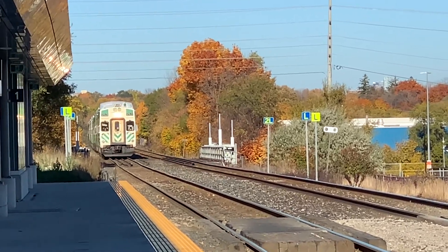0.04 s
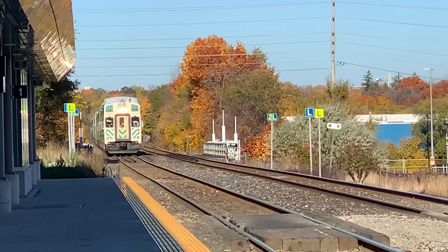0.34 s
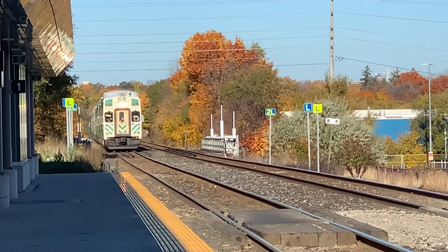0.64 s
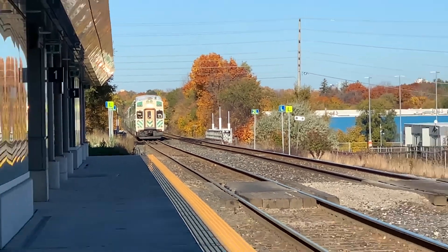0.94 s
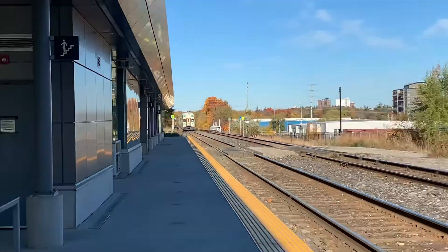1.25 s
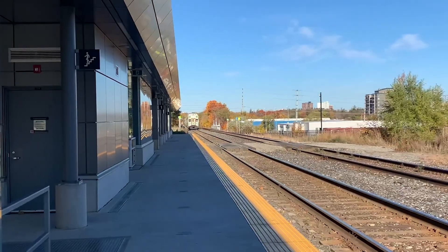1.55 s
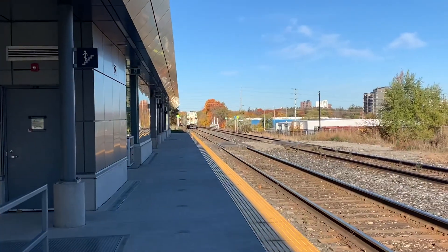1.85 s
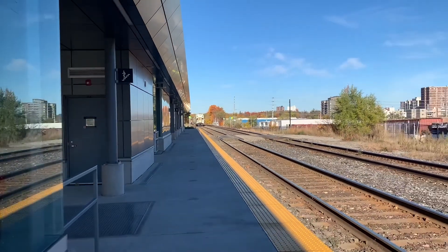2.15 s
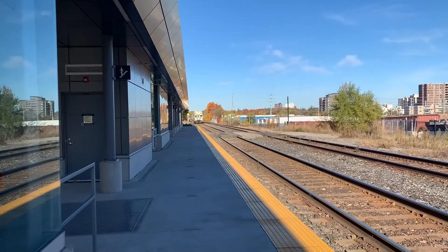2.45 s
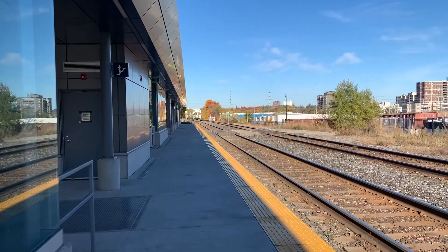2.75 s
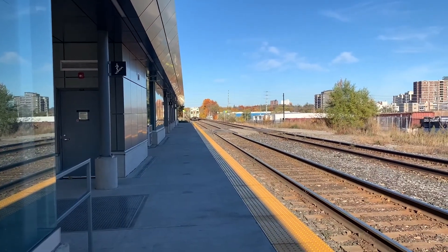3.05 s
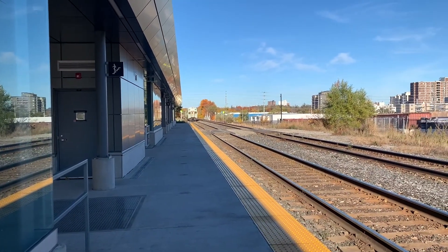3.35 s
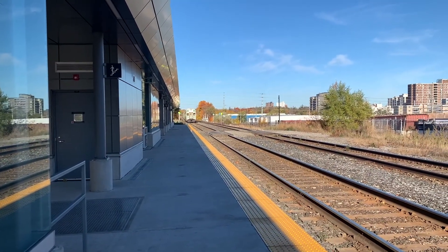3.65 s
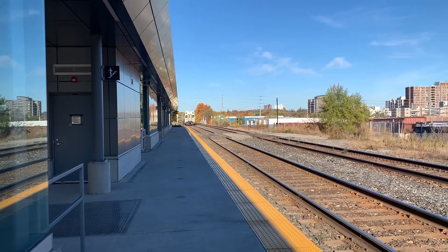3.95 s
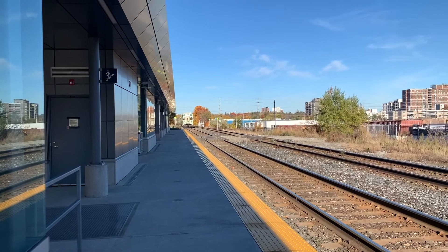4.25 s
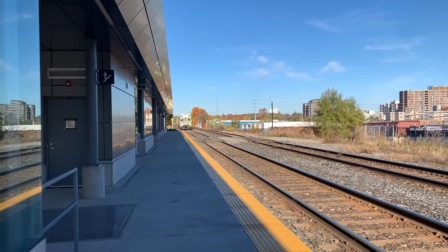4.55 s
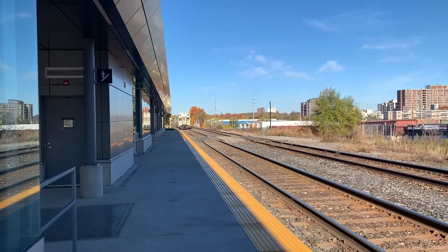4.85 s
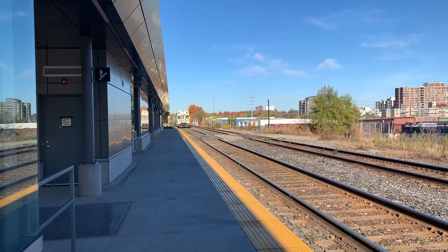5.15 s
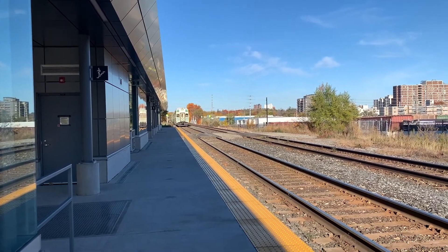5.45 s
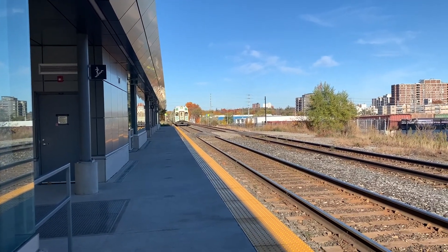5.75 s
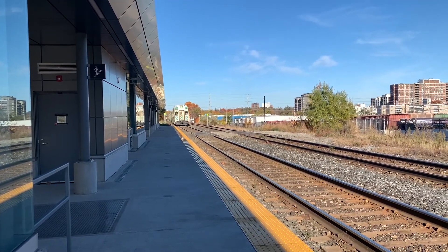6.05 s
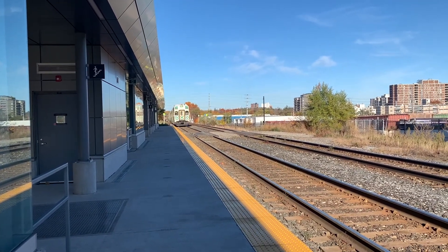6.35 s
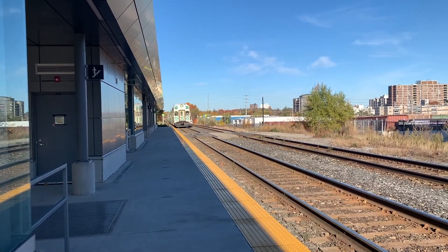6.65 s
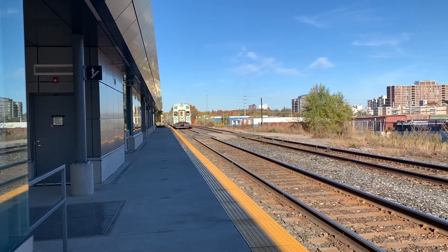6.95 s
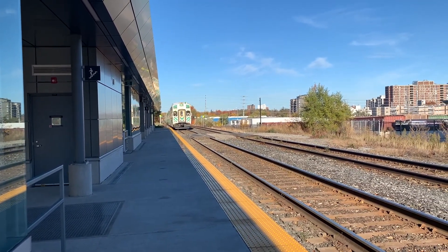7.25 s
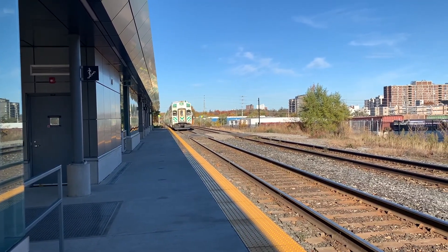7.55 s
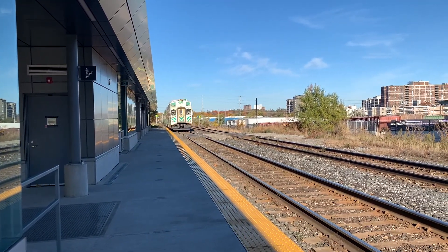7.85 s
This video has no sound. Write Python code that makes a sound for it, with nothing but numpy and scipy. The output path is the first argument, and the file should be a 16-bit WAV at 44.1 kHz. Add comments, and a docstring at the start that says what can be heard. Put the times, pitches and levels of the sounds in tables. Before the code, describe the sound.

Heard from an outdoor platform, a bright metal bell rings in steady strokes from a train some way down the track. Wind buffets the microphone with low thumps over a soft wash of town noise. As the train draws nearer, the bell gets somewhat louder, wheel rumble builds and a low engine drone joins in, followed by a thin, faint hiss along the rails.

```python
"""A commuter train creeps towards an open platform. From the start, over town noise and a breeze that
buffets the microphone, its bell clangs three times every two seconds, echoed by station walls and trees.
As the train brakes, the Doppler shift fades and the bell's pitch sinks. After two seconds the wheels
roll louder, after four the engine's drone rises, and towards the end the rails hiss."""
import sys
import numpy as np
from scipy import signal
from scipy.fft import rfft, irfft, next_fast_len
from scipy.io import wavfile
from scipy.ndimage import uniform_filter1d, map_coordinates

SR = 44100
rng = np.random.default_rng(int(sys.argv[2]) if len(sys.argv) > 2 else 0)


def persist_wave(psi):
    """Save psi, clipped to +-1, as 16-bit WAV."""
    counts = np.round(np.clip(psi, -1, 1) * 32767).astype(np.int16)
    wavfile.write(sys.argv[1], SR, np.atleast_2d(counts).T)


N = 353241


def undb(db):
    """Amplitude ratio of a level in decibels."""
    return 10 ** (np.asarray(db) / 20)


def unit(x):
    """Normalisation to an rms of one."""
    return x / np.sqrt(np.mean(x ** 2))


def curve(table, column=1):
    """Linear interpolation of a time table at every sample."""
    rows = np.array(table)
    return np.interp(np.arange(N) / SR, rows[:, 0], rows[:, column])


def spectrum(table, column=1):
    """Log-frequency interpolation of a table at N + 1 even steps up to SR / 2."""
    rows = np.array(table)
    hz = np.arange(N + 1) * SR / (2 * N)
    return np.interp(np.log(hz + 1), np.log(rows[:, 0]), rows[:, column])


def shape(x, response):
    """Filtering as multiplication by a frequency response."""
    size = next_fast_len(N + SR, real=True)
    bins = np.round(np.linspace(0, N, size // 2 + 1)).astype(int)
    return irfft(rfft(x, size) * response[..., bins], size)[..., :N]


def walk(rate):
    """Smooth random modulation through rate knots a second; spread near one."""
    knots = rng.standard_normal(1024)
    steps = np.arange(0, N, 64)
    coarse = map_coordinates(knots, [steps / SR * rate], order=3, mode="wrap")
    return np.interp(np.arange(N), steps, coarse)


def hump(at_s, half_width_s):
    """Gaussian envelope with a peak of one."""
    return np.exp(-((np.arange(N) / SR - at_s) / half_width_s) ** 2)


def decay(t, rise_s, t60_s):
    """Envelope of a damped vibration: smooth onset, exponential decay."""
    return (1 - np.exp(-(t / rise_s) ** 2)) * np.exp(-np.log(1000) * t / t60_s)


def place(sound, start_s, speed=1):
    """Delay and resampling: speed scales every frequency."""
    out = np.zeros(N)
    first = int(start_s * SR)
    i = np.arange(max(first, 0), min(first + len(sound), N))
    out[i] = map_coordinates(sound, [(i - start_s * SR) * speed], order=3)
    return out


# Microphone ports: f/Hz, phase lead of left/rad, left minus right level/dB
PORT_DIFFERENCES = [(80, -.25, 0), (250, -.35, -2), (500, .8, 1), (1350, 1.25, 1), (1600, 3, -3.5),
                    (1810, 4.55, -1.7), (2150, 5.95, 0), (3000, 5.75, -1), (4330, 6.15, -2),
                    (5770, 7.8, -8), (7500, 2.7, 0), (9400, 0, 0), (11600, -3.1, 0), (14500, -7, 0)]

def from_track(x):
    """Phase and level differences between two ports place a sound down the track."""
    left = np.exp(.5j * spectrum(PORT_DIFFERENCES)) * undb(spectrum(PORT_DIFFERENCES, column=2) / 2)
    return shape(x, np.array([left, 1 / left]))


def noise(colour, diffuse):
    """Superposition of coloured noise from ahead and a diffuse field, uncorrelated between ports."""
    ahead, left, right = unit(shape(rng.standard_normal((3, N)), undb(spectrum(colour))))
    return unit(from_track(ahead) + diffuse * np.array([left, right]))


# Spectra of town noise and airy hiss: f/Hz, relative level/dB
TOWN_SPECTRUM = [(25, -17.5), (120, -11), (750, 4.5), (1100, 0), (1550, -2.5), (2200, -9.5), (2700, -16.5),
                 (3500, -24), (4500, -27), (7000, -62), (12000, -67)]
AIR_SPECTRUM = [(1500, 12.5), (3300, 11), (4500, 8.5), (5500, 1.5), (7000, -1), (9000, -8), (12000, -41)]

def outdoors(town_db, air_db, rise_from_s, rise_db_per_s):
    """A mostly diffuse field: distant town noise, and a hiss that swells briefly, then grows late on."""
    town = noise(TOWN_SPECTRUM, diffuse=2.4) * undb(town_db + 0.57 * walk(0.92) + 1.04 * walk(11))
    swell_db = 6.5 * hump(0.27, 0.73)
    rise_db = rise_db_per_s * np.maximum(np.arange(N) / SR - rise_from_s, 0)
    return town + noise(AIR_SPECTRUM, diffuse=2.7) * undb(air_db + swell_db + rise_db)


# Spectra of wind rumble and flapping: f/Hz, relative level/dB
RUMBLE_SPECTRUM = [(15, -51), (30, -21), (40, 5.5), (80, 5.5), (120, -1.5), (185, -6.5), (280, -17.5),
                   (700, -39.5), (3000, -100)]
FLAP_SPECTRUM = [(20, -38), (60, -13), (130, 2.5), (250, -1.5), (400, -14.5), (900, -34), (3000, -100)]
# Strength of the breeze: t/s, relative level/dB
BREEZE_LEVELS = [(0, -40), (.25, -35), (2.7, -35.5), (4.25, -34), (4.5, -30), (5.65, -30), (6.4, -31),
                 (8, -36.5)]
# Eddies striking the microphone: t/s, relative peak level/dB, f/Hz
EDDIES = [(0.32, -29, 150), (0.478, -25, 106), (0.77, -29, 70), (0.933, -26.5, 91), (3.022, -23, 96),
          (3.206, -24, 109), (3.786, -23, 73.5), (4.39, -21.5, 60.6), (4.41, -22.5, 171),
          (4.865, -19.5, 73.5), (5.139, -20, 78), (5.403, -16, 93), (5.641, -17.5, 86.5),
          (5.754, -15.5, 93), (5.955, -17.5, 80.5), (6.021, -24, 69.4), (6.295, -16, 106)]

def wind(rumble_db, gustiness_db, thump_db, flap_db):
    """Turbulent pressure at the microphone: a gusty rumble, and eddies that thump for a cycle or two."""
    rumble = noise(RUMBLE_SPECTRUM, diffuse=0.26)
    rumble /= np.sqrt(uniform_filter1d(np.mean(rumble ** 2, axis=0), SR // 6))  # even out the power
    rumble *= undb(curve(BREEZE_LEVELS) + rumble_db + gustiness_db * walk(13))
    thumps, gusts = np.zeros((2, N))
    t = np.arange(SR // 5) / SR
    for start, db, hz in EDDIES:
        cycles = hz * t
        swell = undb(db) * (cycles * np.exp(1 - cycles)) ** 2
        thumps += place(swell * np.sin(2 * np.pi * (cycles + rng.random())), start)
        gusts += place(swell ** 1.28, start)  # the strong eddies flap disproportionately more
    flaps = gusts * noise(FLAP_SPECTRUM, diffuse=0.85)
    return rumble + undb(thump_db) * thumps + undb(flap_db) * flaps


# Bell modes: f/Hz, relative level/dB, T60/s, rise/s, beat/Hz, twin's amplitude ratio (< 0: antiphase)
BELL_MODES = [(1368, -5.5, 0.92, 0.0032, 12, 0.16), (1504, -6, 1.5, 0.0016, 6.7, 0.96),
              (1630, 1.5, 3.9, 0.0025, 12, 0.22), (1652, 11, 0.17, 0.0015, 22, 0.49),
              (1833, 9, 1.81, 0.001, 3.8, 0.096), (2157, 6, 0.091, 0.0013, 85, 0.18),
              (2218, -1.5, 0.086, 0.00071, 130, 1), (2730, -19, 0.58, .003, 4.5, -0.41),
              (3017, 6.5, 1.78, 0.014, 2.1, -0.1), (3006, 23.5, 0.1, 0.019, 2.5, 0.63),
              (3310, -6.5, 0.22, 0.0027, 21, 0.94), (3752, 2.5, 0.23, 0.0077, 29, 0.71),
              (3960, 0.5, 0.058, 0.00035, 26, 0.96), (4368, 1.5, 2, 0.0063, 4.35, -0.65),
              (5822, 7, 1.31, 0.022, 4.54, -0.68), (5930, -3, 0.45, 0.0082, 45, 0.81),
              (6160, -14, 1, .01, 27, 0.68), (7600, -9, 0.69, 0.0087, 46, 0.81)]
# The bell's low, main, clank, upper, ping, high and top tones: f/Hz
BELL_TONES = (1645, 1831, 2170, 3015, 3735, 4365, 5844)
# Band around the main tone: f/Hz, share subject to ground interference
MAIN_BAND = [(1715, 0), (1755, 1), (1885, 1), (1940, 0)]

def clang(tones_db, beat_scatter=0.13, waver_db=5.0, rough_rad=.9, rough_below_hz=1700):
    """Modal vibration after one stroke: each damped mode beats with a twin of nearby frequency."""
    t = np.arange(int(.75 * SR)) / SR
    ring = np.zeros(len(t))

    def jitter(rate):
        return map_coordinates(rng.standard_normal(64), [t * rate], order=2, mode="wrap")

    for hz, db, t60, rise, beat_hz, twin in BELL_MODES:
        stroke_db = np.interp(hz, BELL_TONES, tones_db)
        # as the train moves, the side modes waver on their own, more as they age
        side_share = 1 - np.interp(hz, *np.array(MAIN_BAND).T)
        path_db = waver_db * np.tanh(jitter(22)) * np.minimum(t / 0.18, 1) * side_share
        phase = 2 * np.pi * hz * t + (rough_rad * jitter(70) if hz < rough_below_hz else 0)
        twin_lag = 2 * np.pi * beat_hz * (1 + beat_scatter * rng.standard_normal()) * t
        pair = np.sin(phase) + twin * np.sin(phase - twin_lag)
        ring += undb(db + stroke_db + path_db) * decay(t, rise, t60) * pair
    return ring * np.interp(t, [0, .66, .72], [1, 1, 0])  # the next blow checks the old ring


def echoes(x, t60_s, build_s):
    """Reverberation: convolution with dense, decaying reflections, different in each port."""
    t = np.arange(SR) / SR
    tail = rng.standard_normal((2, SR)) * np.exp(-np.log(1000) * t / t60_s) * (1 - np.exp(-t / build_s))
    tail /= np.sqrt(np.sum(tail ** 2) / 2)
    return signal.fftconvolve(x[None], tail, axes=1)[:, :N]


# Swells and dropouts of the main tone: t/s, level change/dB, half-width/s
INTERFERENCE = [(.49, -5, .035), (0.873, -6, 0.15), (1.51, -8, 0.063), (1.81, -5, 0.033), (1.96, 3, 0.06),
                (2.14, -15, .1), (2.4, -6, 0.027), (2.545, -1, 0.03), (2.627, 12.5, .04), (3.064, -4, .035),
                (3.26, -19, 0.053), (3.7, -9, 0.041), (3.812, 8, 0.036), (4.1, -3, 0.13),
                (4.495, 4.5, 0.17), (4.61, -7, 0.027), (4.964, -13, 0.034), (5.108, -15, .018),
                (5.19, -7, .018), (5.268, 5, .05), (5.656, -9, 0.016), (5.873, 4.5, 0.031),
                (6.116, -4, 0.1), (6.248, -11, 0.027), (6.355, -16, 0.028), (6.472, 6, 0.043),
                (7.063, -11, 0.039), (7.223, 5.5, 0.07), (7.335, -7, 0.047), (7.68, -14, .04),
                (7.798, 9, 0.024), (7.967, 2.5, 0.029)]

def ground_bounce(x):
    """Interference, as a varying gain: the ground reflection reinforces or cancels the main tone."""
    change_db = sum(db * hump(at, width) for at, db, width in INTERFERENCE)
    return x + (undb(change_db) - 1) * shape(x, spectrum(MAIN_BAND))


# Clapper strokes: t/s, then relative level/dB at each of the seven BELL_TONES
BELL_STROKES = [(0.341, -45.5, -41, -36, -48.5, -61, -64.5, -77),
                (0.9887, -48, -41.5, -35.5, -49.5, -53.5, -59.5, -84),
                (1.639, -45, -40.5, -38, -49.5, -48.5, -63.5, -78),
                (2.291, -50.5, -47.5, -40.5, -48.5, -56, -56, -76),
                (2.9434, -46.5, -43.5, -43, -51, -56, -58, -78),
                (3.5955, -45.5, -44, -38.5, -47.5, -63, -61, -73.5),
                (4.2501, -42.5, -45, -37.5, -43, -52, -52, -60),
                (4.9035, -43.5, -44, -33.5, -46, -44.5, -51, -62),
                (5.5586, -43, -39.5, -40, -44, -41.5, -56, -57.5),
                (6.2134, -41.5, -40, -40, -40.5, -51, -56, -66.5),
                (6.869, -39, -36.5, -37, -42.5, -49, -52, -54.5),
                (7.5243, -39, -35.5, -35, -40.5, -44, -56, -53)]
# Spectra of the clapper's knock and its bright edge: f/Hz, relative level/dB
KNOCK_SPECTRUM = [(600, -36), (1400, 5), (2100, 5.5), (2750, -14.5), (3900, -16), (5100, -29), (6000, -36),
                  (7200, -45), (12000, -81)]
CLICK_SPECTRUM = [(2500, -15), (4200, 1), (5500, -4), (7000, -17), (12000, -53)]

def bell(sink_per_s, flutter_db, station_db, trees_db, trees_sink, trees_cutoff_hz, knock_db, click_db):
    """Impacts ring the bell; its Doppler shift fades with braking and is smaller towards the trees."""
    earlier = (2 * BELL_STROKES[0][0] - BELL_STROKES[1][0], *BELL_STROKES[0][1:])  # already ringing
    direct, aside, knocks, clicks = np.zeros((4, N))
    blow = decay(np.arange(SR // 3) / SR, rise_s=.0006, t60_s=.11)
    for start, *tones_db in [earlier, *BELL_STROKES]:
        _, _, clank_db, _, _, high_db, _ = tones_db
        ring = clang(tones_db)
        speed = 1 - sink_per_s * start
        direct += place(ring, start, speed)
        knocks += place(undb(clank_db) * blow, start)
        clicks += place(undb(high_db) * blow, start)
        for slant in 2 * rng.random(4):  # four oblique paths, each lower in pitch
            aside += place(ring, start, speed - trees_sink * slant)
    direct *= undb(flutter_db * walk(8.3))  # moving air makes the level flutter
    knock = undb(knock_db) * knocks * noise(KNOCK_SPECTRUM, diffuse=0.93)
    click = undb(click_db) * clicks * noise(CLICK_SPECTRUM, diffuse=0.83)
    station = undb(station_db) * echoes(direct, t60_s=0.14, build_s=0.007)
    dulled = signal.sosfilt(signal.butter(2, trees_cutoff_hz, fs=SR, output="sos"), aside)
    trees = undb(trees_db) * echoes(dulled, t60_s=1.0, build_s=0.0043)
    return knock + click + ground_bounce(from_track(direct) + station + trees)


# The approach: t/s, relative wheel level/dB, relative engine level/dB
APPROACH_LEVELS = [(0, -51, -55), (2.1, -49.5, -54.5), (3.7, -45, -57), (5.3, -41.5, -43.5),
                   (6.2, -41, -39.5), (6.7, -37.5, -34.5), (8, -35, -38)]
# Rolling noise: f/Hz, relative level/dB
WHEEL_SPECTRUM = [(25, -37), (100, 0), (200, -7), (360, 2.5), (520, -2.5), (830, -7), (1050, -18),
                  (2000, -20.5), (4000, -34), (9000, -76.5)]
# Engine drone: f/Hz, relative level/dB, bandwidth/Hz
ENGINE_BANDS = [(80.9, -2, 8), (159.5, -5, 18), (238.3, -7, 25), (362.6, -12, 45), (498.6, -4, 18),
                (669, -7.5, 60), (798, -16.5, 80), (915, -14, 55)]

def train(wheel_db, engine_db):
    """Broadband wheel noise and narrowband engine drone grow louder as the distance shrinks."""
    wheels = noise(WHEEL_SPECTRUM, diffuse=0.92) * undb(curve(APPROACH_LEVELS) + wheel_db + walk(6))
    drone = np.zeros(N)
    for hz, db, width in ENGINE_BANDS:
        phase = 2 * np.pi * hz * np.arange(N) / SR
        drone += undb(db) * (walk(width) * np.sin(phase) + walk(width) * np.cos(phase))
    return wheels + from_track(drone * undb(curve(APPROACH_LEVELS, column=2) + engine_db))


# Small nearby ticks and soft swells: t/s, peak level/dB, f/Hz, half-width/s
NEAR_TICKS = [(0.114, -48.5, 2300, 0.0039), (4.655, -65, 13400, 0.011)]
SOFT_SWELLS = [(3.21, -45.5, 1270, 0.12), (5.72, -40.5, 760, 0.33)]

def ticks_and_swells():
    """Amplitude-modulated narrowband noise: a short envelope gives a tick, a long one a swell."""
    out = np.zeros((2, N))
    for at, db, hz, width in [*NEAR_TICKS, *SOFT_SWELLS]:
        band = [(hz / 2, -100), (hz / 1.25, -10), (hz, 0), (hz * 1.25, -10), (hz * 2, -100)]
        out += undb(db) * hump(at, width) * noise(band, diffuse=0.31)
    return out


# Hiss of the rails: f/Hz, relative level/dB
RAIL_SPECTRUM = [(3000, 3.5), (7000, -24.5), (9000, -5.5), (9750, 2), (11000, -2), (13300, 2), (15000, -10)]

def rails(start_db, rise_db_per_s):
    """As waveguides, the rails carry a hiss ahead of the train; it grows steadily and flares twice."""
    level_db = start_db + rise_db_per_s * np.arange(N) / SR
    flares_db = 8.5 * hump(6.67, 0.49) + 7.5 * hump(8.0, 0.67)
    return noise(RAIL_SPECTRUM, diffuse=0.04) * undb(level_db + flares_db + .8 * walk(25))


def scene():
    """Linear superposition of all sources at the platform."""
    return (outdoors(town_db=-44.0, air_db=-61.5, rise_from_s=5.46, rise_db_per_s=3.5)
            + wind(rumble_db=1.0, gustiness_db=2.5, thump_db=-1.0, flap_db=-3)
            + bell(sink_per_s=.00178, flutter_db=1.5, station_db=-11.5, trees_db=-12.5,
                   trees_sink=0.00501, trees_cutoff_hz=3950, knock_db=3.5, click_db=-5)
            + train(wheel_db=1.5, engine_db=-1.5)
            + ticks_and_swells()
            + rails(start_db=-81, rise_db_per_s=1.59))


def record(dry):
    """Band limiting: the phone passes 22 Hz to 15.1 kHz."""
    low_cut = signal.butter(2, 22, "high", fs=SR, output="sos")
    top_cut = signal.ellip(8, .2, 70, 15100, fs=SR, output="sos")
    return signal.sosfilt(top_cut, signal.sosfilt(low_cut, dry))


dry = scene()
out = record(dry)
persist_wave(out)
```